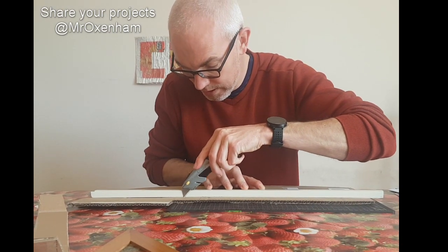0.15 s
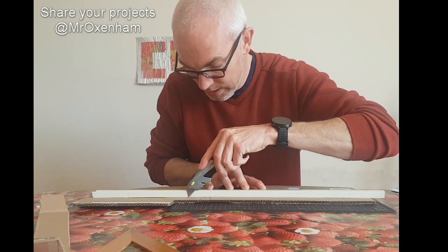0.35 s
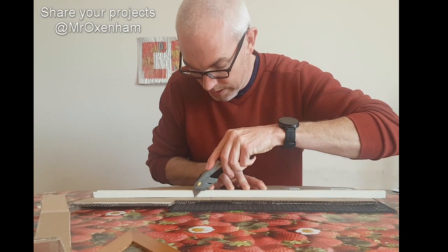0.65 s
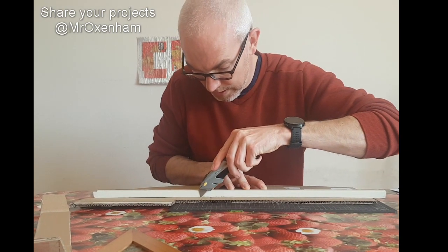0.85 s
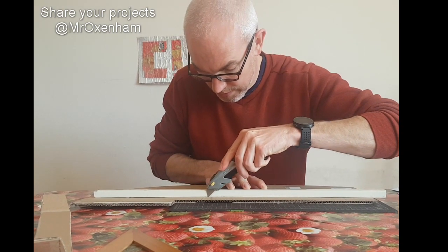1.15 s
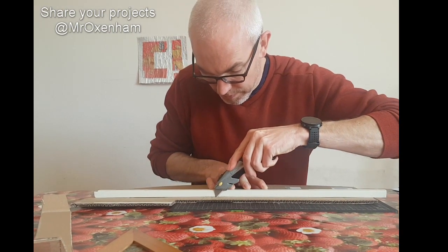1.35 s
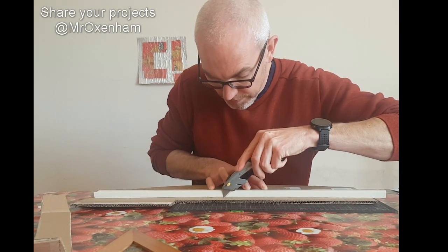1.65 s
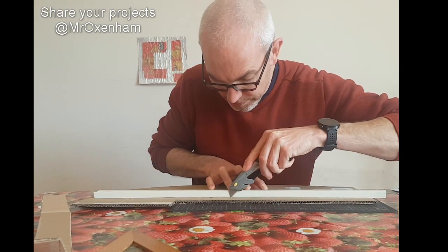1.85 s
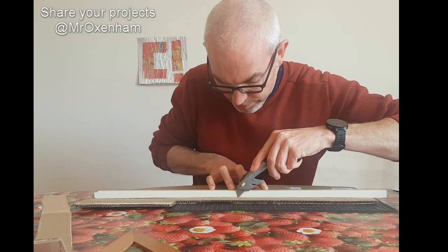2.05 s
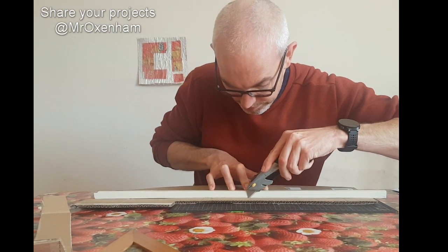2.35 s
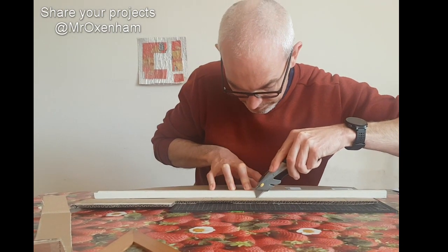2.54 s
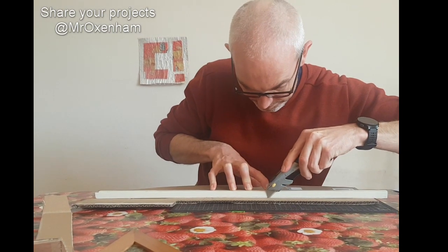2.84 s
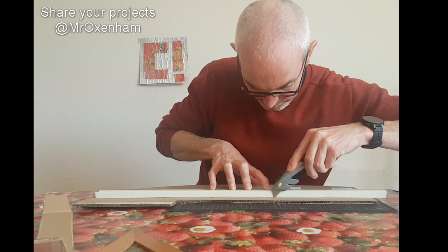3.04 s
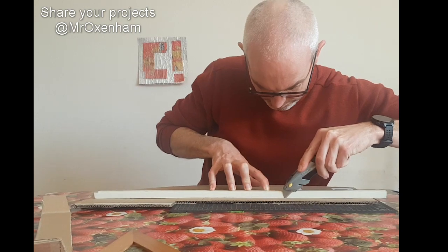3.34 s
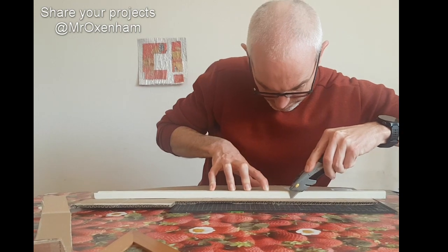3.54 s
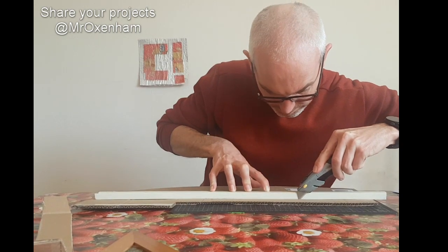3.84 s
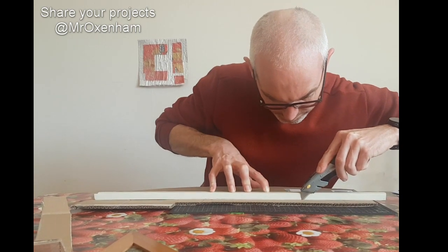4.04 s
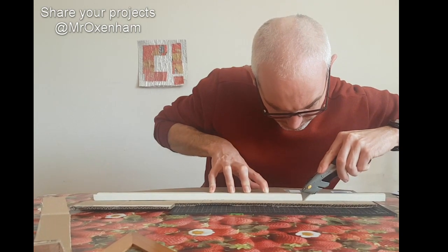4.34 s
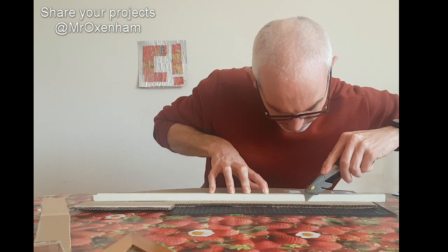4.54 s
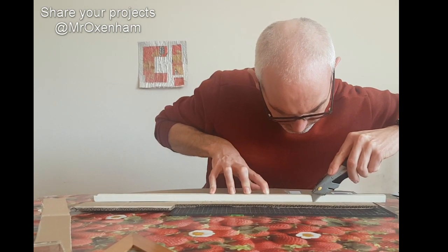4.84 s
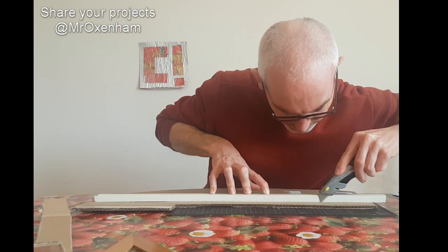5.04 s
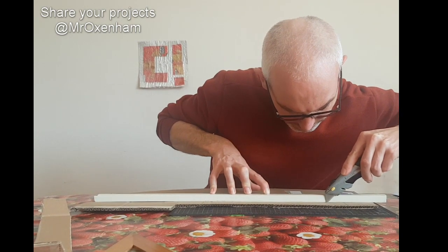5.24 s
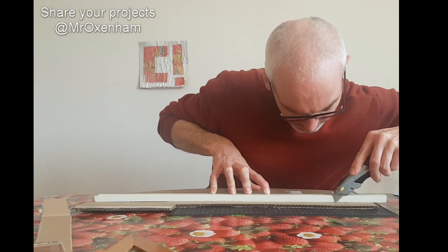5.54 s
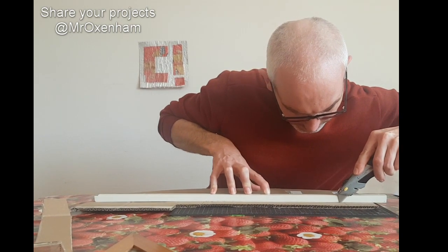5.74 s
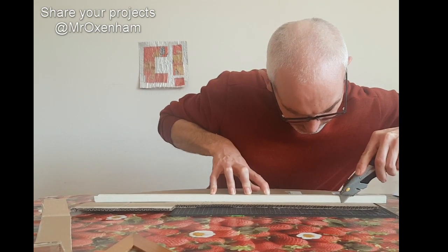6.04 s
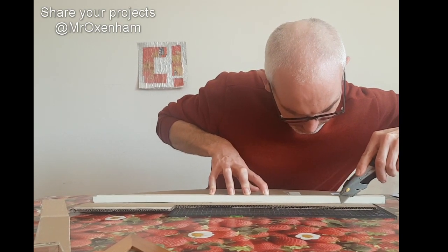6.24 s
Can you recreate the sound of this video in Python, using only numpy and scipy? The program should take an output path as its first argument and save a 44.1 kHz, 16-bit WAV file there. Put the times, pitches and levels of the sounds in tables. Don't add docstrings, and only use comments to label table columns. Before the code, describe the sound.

A utility knife rasps slowly through corrugated cardboard, fibres hissing and flutes popping in uneven bursts, with hollow board knocks and low table thumps.

```python
import sys
import numpy as np
from scipy import signal
from scipy.io import wavfile
from scipy.ndimage import uniform_filter1d, map_coordinates

SR = 44100
rng = np.random.default_rng(int(sys.argv[2]) if len(sys.argv) > 2 else 0)


def decibels_to_gain(level_db):
    exponent = np.asarray(level_db, float) / 20
    return 10 ** exponent


def store_wav(level_fs):
    pcm = np.round(np.clip(np.atleast_2d(level_fs), -1, 1) * 32767)
    wavfile.write(sys.argv[1], SR, pcm.T.astype(np.int16))


N = 281799
T = np.arange(N) / SR

# start_s, hiss_db
DRAG = [(0.0, -62.5), (0.55, -59.5), (0.72, -50.5), (1.0, -52.5), (1.22, -55.5), (1.51, -48.5), (1.58, -58),
        (1.72, -50.5), (2.45, -49), (2.75, -49), (3.9, -58.5), (4.15, -60), (4.25, -75), (4.6, -66),
        (4.9, -55.5), (5.4, -54.5), (5.88, -61), (6.03, -72.5)]
# start_s, table_db, board_db, blade_tuning (factor), board_pitch_hz
HOLD = [(0, -14, -1, 0.99, 483), (.86, -12.5, -5.5, 1.1, 484), (.95, -3, 1, 1.08, 600),
        (1.5, -10, 0.5, 1.03, 594), (1.9, 3, 2, 1.27, 487), (2.8, 9.5, 2, 1.18, 430),
        (3.6, 9.5, 5, 1.1, 442), (4.45, 9, 2, 1.22, 525), (5.3, -9.5, 0.9, 1.09, 620),
        (5.8, -1, 4.5, 0.94, 493), (6.39, -6, -4.5, 1.04, 500)]
# start_s, hiss_db, rise_ms
SLICED = [(0.042, -50.5, 23), (0.19, -48, 55), (1.07, -41.5, 32), (1.75, -47, 29), (1.835, -40, 4.3),
          (2.599, -40.5, 9.1), (3.723, -43.5, 15), (3.799, -55, 17), (4.13, -52, 4.8), (4.475, -53, 24),
          (4.54, -57, 23), (5.071, -46, 46), (5.547, -43.5, 39), (5.687, -46, 19), (5.762, -45, 15),
          (5.791, -40, 5.6), (6.138, -42.5, 24)]
# start_s, hiss_db, rise_ms
TORN = [(0.122, -45.5, 14), (0.285, -41.5, 15.7), (0.452, -39.5, 11), (0.767, -38, 7.3), (1.203, -41, 19.5),
        (1.287, -43, 30), (1.981, -39.5, 9), (2.068, -45, 12), (2.555, -43.5, 34), (2.686, -42.5, 18),
        (2.791, -43.5, 21), (2.855, -47, 14), (2.892, -45, 22), (3.005, -45.5, 27), (3.298, -42, 21),
        (3.515, -40, 20), (3.587, -43, 21), (3.865, -43.5, 12.7), (3.903, -52.5, 22), (3.951, -47.5, 24),
        (4.069, -53.5, 24), (4.667, -45.5, 21), (4.827, -48.5, 34), (4.952, -47, 21), (5.346, -42, 17),
        (5.476, -43, 28)]
# start_s, hiss_db, rise_ms
CRUSHED = [(0.858, -45, 11), (0.924, -37, 6.7), (1.365, -43, 36), (1.43, -45, 14), (1.504, -46.5, 29),
           (1.646, -42, 14.5), (2.153, -43, 11.5), (2.232, -40.5, 9.6), (2.308, -49, 46), (2.4, -53, 14),
           (3.098, -44.5, 22), (3.216, -42, 18.4), (3.41, -46, 29), (5.105, -48, 16), (5.208, -44, 20),
           (5.885, -57, 30), (5.95, -61.5, 25)]
# start_s, hiss_db
CATCHES = [
    (.412, -44.5),
    (.598, -50),
    (0.655, -40),
    (1.18, -47),
    (1.615, -42.5),
    (4.426, -52),
    (4.642, -66),
    (5.187, -58),
    (5.325, -47.5),
    (6.088, -59),
]
# centre_s, loss_db
STALLS = [(.38, 5), (1.02, 4.5), (1.145, -0.5), (2.64, 6), (2.735, 7), (2.955, 2), (3.05, 5), (3.16, 7.5),
          (3.25, 4), (3.47, 1.5), (3.665, 1), (4.02, 4.5), (4.395, 6.5), (4.62, 5.5), (4.75, 4.5),
          (5.29, 6), (5.41, 6), (5.63, 4.5)]
# start_s, peak_db, pitch_hz
KNOCKS = [(0.277, -47, 423), (0.761, -36, 600), (0.925, -11, 580), (1.04, -29, 610), (1.091, -20, 412),
          (1.197, -29, 633), (1.252, -20.5, 595), (1.33, -28, 624), (1.392, -19, 585), (1.477, -21, 396),
          (1.645, -20.5, 945), (1.857, -26, 643), (1.947, -19.5, 198), (2.188, -17.5, 217),
          (2.264, -20, 213), (2.336, -18.5, 123), (2.808, -16, 196), (2.985, -53, 122.5), (3.21, -19, 212),
          (3.325, -23.5, 200), (3.417, -20.5, 180), (3.586, -25.5, 208), (3.86, -31, 240),
          (4.647, -39, 215), (4.798, -37, 431), (4.879, -24.5, 423), (4.934, -28, 684), (5.188, -35, 673),
          (5.758, -45, 565), (5.851, -14.5, 375),
          (0.703, -37, 444), (1.062, -34, 670), (1.291, -26.5, 410), (1.676, -32, 650), (1.779, -25, 390),
         (1.897, -26, 620), (1.948, -19, 630), (2.15, -23.5, 650), (2.189, -24, 640), (2.265, -23, 640),
         (2.336, -25, 620), (2.636, -26.5, 400), (2.718, -28, 380), (3.001, -27, 540), (3.225, -32, 410),
         (3.329, -30, 410), (4.825, -31, 700), (5.081, -30, 900), (5.225, -27.5, 560), (5.788, -28, 390),
         (6.147, -29, 397)]
# start_s, peak_db, brightness_db (per octave)
SNAPS = [(0.077, -46, -2), (1.336, -32, 1), (1.4277, -38, 2), (1.6441, -24.5, 0.5), (1.98, -55, 0.1),
         (3.416, -25.5, -3), (3.5093, -31.5, 4.5), (4.0444, -40, -9), (4.1272, -41, -1), (5.103, -47, 6),
         (5.757, -32.5, 3)]
# peak_s, pressure (full scale, suction below zero), rise_ms, fall_ms
PUFFS = [
    (3.9673, -.31, 1.8, 5),
    (3.9693, -.65, .7, .34),
    (3.9704, 1.36, .45, 1.72),
    (3.974, .37, 1.3, 1),
    (6.346, .006, 1.5, 2.5),
]
# pitch_hz, width_hz, level_db
TABLE_MODES = [(68, 110, -28), (125.5, 9.2, 7), (200.7, 44, 9), (285, 540, -17), (328, 23, 3)]
# pitch_hz, width_hz, level_db
BOARD_MODES = [(327, 9.8, -10), (423, 23, 13), (495, 73, 1.5), (620, 184, 10), (760, 38, 4), (872, 76, 8),
               (944, 52, -4), (1340, 180, 3.5)]
# pitch_hz, width_hz, lift_db, follows_tuning (0-1)
BLADE_MODES = [(2653, 100, 9, 0.13), (3625, 1100, 7.5, 0.63), (11280, 780, 5, 0.25), (14200, 800, 2.5, 0)]
# freq_hz, level_db (per Hz)
FIBRE_COLOUR = [(600, -17.5), (1100, -3.5), (1600, -5), (2200, -1), (3300, -3.5), (4200, -3.5), (5200, -1),
                (7000, -4), (8900, -13.5), (10500, -9), (13000, -11.5), (15600, -9), (16100, -39)]
# freq_hz, difference_db
LEFT_COLOUR = [(1000, 5), (2500, 3), (4000, 5), (6000, -2), (8000, -4), (12000, -2), (16000, -4)]
# freq_hz, level_db (per Hz)
FAN_COLOUR = [(900, -32), (1300, -9.5), (1750, 2), (2100, 0.5), (2700, -1), (3150, -10.5), (4000, -16),
              (4800, -27), (6500, -28), (8800, -38), (12000, -32), (15500, -26.5), (16000, -42)]
# freq_hz, level_db (per Hz)
HUSH_COLOUR = [(30, 6), (80, 2.5), (200, -4), (400, 8.5), (700, -3), (1100, 1), (1800, -11), (4000, -17),
               (7000, -23), (10000, -28), (16000, -15)]
# freq_hz, t60_s
ROOM_DECAY = [(200, 0.13), (700, 0.52), (2000, 0.4), (5000, 0.45), (12000, 0.21)]

SLICED_PUSH_DB, TORN_PUSH_DB, CRUSHED_PUSH_DB = -2.5, -1.5, 3
RELEASE_SHARE = 0.78
STRAIN_DB, STRAIN_SHARE, SETTLE_MS = -8.5, 1.76, 40
CATCH_RISE_MS, CATCH_FALL_MS, CATCH_PUSH_DB = 4.9, 17.4, -2
STALL_MS = 24.4
FIZZ_DB, FIZZ_S, FIZZ_SPAN_S = 3, 3, 2.45
TOP_DB, TOP_S, TOP_SPAN_S = 5.5, 5.5, 1
SQUEAK_HZ, SQUEAK_WIDTH_HZ, SQUEAK_DB, SQUEAK_FADES_S = 3690, 120, 7, 0.92
SLIT_HZ, SLIT_WIDTH_HZ, SLIT_DB, SLIT_OPEN_S = 1165, 360, 5.5, 1.56
TABLE_HZ, TABLE_HALVES_S = 226, 3.6
LAG_START, LAG_PER_S = 0.088, 0.9
FAN_DB, HUSH_DB = -51, -66


def evened(x):
    return x / np.sqrt(np.mean(x ** 2) + 1e-20)


def read(points, hz):
    f, value = np.transpose(points)
    return np.interp(np.log(hz + 1), np.log(f + 1), value)


def colour(x, points):
    log_gain = np.log(decibels_to_gain(read(points, abs(np.fft.fftfreq(4096, 1 / SR)))))
    taps = np.fft.ifft(np.exp(np.conj(signal.hilbert(log_gain)))).real
    return signal.oaconvolve(x, taps[:2048])[:len(x)]


def low_cut(x, hz):
    return signal.sosfilt(signal.butter(2, hz, "high", fs=SR, output="sos"), x)


def ring(x, modes):
    out = np.zeros(len(x))
    for hz, width, db in modes:
        r = np.exp(-np.pi * width / SR)
        pole = r * np.exp(2j * np.pi * hz / SR)
        out += decibels_to_gain(db) * 2 * signal.lfilter([1 - r], [1, -pole], x).imag
    return out


def favour(hz, pitch_hz):
    octaves = abs(np.log2(hz / pitch_hz))
    return -9 * octaves ** 2 / (1 + .5 * octaves)


def grains(per_s, spread_db):
    draw = rng.random((3, N))
    size = decibels_to_gain(spread_db * np.minimum(-np.log(draw[0] + 1e-9), 5))
    sign = np.sign(draw[1] - .5)
    return evened(size * sign * (draw[2] < per_s / SR))


def add(mix, s, sound):
    part = mix[round(s * SR):][:len(sound)]
    part += sound[:len(part)]


def hold(column):
    return np.interp(T, [row[0] for row in HOLD], [row[column] for row in HOLD])


def force():
    hiss = decibels_to_gain(np.interp(T, *np.transpose(DRAG)) - 4.5) ** 2
    push = hiss.copy()
    kinds = (SLICED, SLICED_PUSH_DB), (TORN, TORN_PUSH_DB), (CRUSHED, CRUSHED_PUSH_DB)
    walls = [(s, db, ms, RELEASE_SHARE * ms, push_db) for rows, push_db in kinds for s, db, ms in rows]
    catches = [(s, db, CATCH_RISE_MS, CATCH_FALL_MS, CATCH_PUSH_DB) for s, db in CATCHES]
    for s, db, rise_ms, fall_ms, push_db in walls + catches:
        near = slice(max(round((s - .15) * SR), 0), round((s + .2) * SR))
        ms = 1000 * (T[near] - s)
        swell_ms = np.where(ms < 0, rise_ms, fall_ms)
        strain_ms = np.where(ms < 0, STRAIN_SHARE * rise_ms, SETTLE_MS)
        swell = decibels_to_gain(db - 5.5) ** 2 * np.exp(-abs(ms / swell_ms) ** 2.5)
        strain = decibels_to_gain(db - 7.0 + STRAIN_DB) ** 2 * np.exp(-(ms / strain_ms) ** 2)
        hiss[near] += swell + strain
        push[near] += swell * decibels_to_gain(push_db - 2.5) ** 2 + strain
    moving = decibels_to_gain(-sum(db * np.exp(-(1000 * (T - s) / STALL_MS) ** 2) for s, db in STALLS))
    return moving * np.sqrt(hiss), moving * np.sqrt(push)


def fibres(hiss):
    streams = [grains(14000, 2.0) for k in range(3)]
    hz, t, z = signal.stft(streams, SR, nperseg=256, noverlap=192)
    hz, tuning = hz[:, None], np.interp(t, T, hold(column=3))

    patches = rng.standard_normal((len(t), len(hz))).T
    patches = uniform_filter1d(patches, size=6, axis=0)
    patches = evened(uniform_filter1d(patches, size=24, axis=1))

    effort_db = 20 * np.log10(hiss)
    excess_db = effort_db - uniform_filter1d(effort_db, size=12000)
    surge_db = 5.1 * np.tanh((excess_db + 4.5) / 6.8) - 0.54 * excess_db
    chatter_db = 2.8 * evened(uniform_filter1d(rng.standard_normal(len(t)), size=6))
    passing = np.exp(-((t - FIZZ_S) / FIZZ_SPAN_S) ** 2)
    fizz_db = (FIZZ_DB + np.interp(t, T, surge_db)) * passing - 1.5 + chatter_db
    tip_db = TOP_DB * np.exp(-((t - TOP_S) / TOP_SPAN_S) ** 2) - 2.0
    squeak_db = SQUEAK_DB * np.exp(-(t / SQUEAK_FADES_S) ** 2)
    slit_db = SLIT_DB * (np.tanh(t - SLIT_OPEN_S) / 2)

    db = read(FIBRE_COLOUR, hz) + 2.1 * patches
    db = db + fizz_db / (1 + (8000 / (hz + 1)) ** 6)
    db = db + tip_db / (1 + (12800 / (hz + 1)) ** 16)
    db = db + squeak_db / (1 + (2 * (hz - SQUEAK_HZ) / SQUEAK_WIDTH_HZ) ** 2)
    db = db + slit_db / (1 + (2 * (hz - SLIT_HZ) / SLIT_WIDTH_HZ) ** 2)
    for centre_hz, width, lift_db, follows in BLADE_MODES:
        db = db + lift_db / (1 + (2 * (hz - centre_hz * tuning ** follows) / width) ** 2)
    return evened(signal.istft(z * decibels_to_gain(db), SR, nperseg=256, noverlap=192)[1][:, :N])


def drumming(push):
    out = np.zeros(N)
    table_hz = TABLE_HZ * .5 ** (T / TABLE_HALVES_S)
    board = grains(700, 2.1), BOARD_MODES, hold(column=2), hold(column=4), 230
    table = grains(1500, 2.0), TABLE_MODES, hold(column=1), table_hz, 52
    for slips, modes, coupling_db, pitch_hz, cut_hz in (board, table):
        slips = uniform_filter1d(slips, size=16)
        drive = slips * push * decibels_to_gain(coupling_db + 2.5) / ring(slips, modes).std()
        body = sum(ring(drive * decibels_to_gain(0.64 * favour(mode[0], pitch_hz)), [mode]) for mode in modes)
        out += low_cut(low_cut(body, cut_hz), cut_hz)
    return low_cut(out, 67)


def fan():
    flutter = evened(uniform_filter1d(rng.standard_normal(N), 300))
    hiss = evened(colour(rng.standard_normal(N), FAN_COLOUR)) * decibels_to_gain(FAN_DB + 0.54 * flutter)
    return np.array([hiss, decibels_to_gain(-29) * np.roll(hiss, 9)])


def hush():
    left, right, shared = (evened(colour(v, HUSH_COLOUR)) for v in rng.standard_normal((3, N)))
    return decibels_to_gain(HUSH_DB) * np.array([decibels_to_gain(2) * (left + 1.43 * shared), right + 1.04 * shared]) / 1.9


def ears(x):
    late = map_coordinates(x, [np.arange(N) - LAG_START - LAG_PER_S * T], order=3, mode="nearest")
    return np.array([late, x])


def tail():
    taps = np.zeros((2, SR // 2))
    at = np.arange(120, SR // 2 - 20, 20) + rng.integers(0, 20, (2, (SR // 2 - 121) // 20))
    np.put_along_axis(taps, at, rng.choice([-1., 1.], at.shape), 1)
    hz, t, z = signal.stft(taps, SR, nperseg=256)
    decay = decibels_to_gain(-60 * t / read(ROOM_DECAY, hz)[:, None])
    out = signal.istft(z * decay, SR, nperseg=256)[1]
    return out / np.linalg.norm(out[0])


def room(x):
    shares = [np.sqrt(2 / 3) * np.cos(2 * np.pi * (T / 1.3 + k / 3)) for k in range(3)]
    return sum(signal.fftconvolve((x * share)[None], tail(), axes=1)[:, :N] for share in shares)


def snaps():
    out, t = np.zeros(N), np.arange(400) / SR
    envelope = np.exp(-(t / .0028) ** 2) * (1 - np.exp(-(t / .0016) ** 3))
    for s, db, tilt_db in SNAPS:
        tint = [(700, -30), (1500, -tilt_db - 4), (6000, 0), (8900, -6), (12000, tilt_db), (16000, tilt_db - 2)]
        crack = colour(rng.standard_normal(400) * envelope, tint)
        add(out, s + 0.00071, decibels_to_gain(db + 4.0) * crack / abs(crack).max())
    return out


def knocks():
    out = np.zeros(N)
    for s, db, hz in KNOCKS:
        blow, start = np.zeros(3000), 50
        if hz < 300:
            blow[start:start + 56] = -np.hanning(56)
        else:
            blow[start:start + 44] = np.sin(np.linspace(0, 2 * np.pi, 44))
        modes = [(f, 0.72 * width, level + 0.97 * favour(f, hz)) for f, width, level in TABLE_MODES + BOARD_MODES]
        knock = low_cut(low_cut(ring(blow, modes), 0.29 * hz), 0.32 * hz)
        add(out, s, decibels_to_gain(db - 8.5) * knock / abs(knock).max())
    return low_cut(out, 67)


def puffs():
    out = np.zeros(N)
    for s, pressure, rise_ms, fall_ms in PUFFS:
        ms = 1000 * (T - s)
        out += pressure * np.exp(-(ms / np.where(ms < 0, rise_ms, fall_ms)) ** 2)
    out = low_cut(out, 75)
    return np.array([out, 0 * out])


def scene():
    hiss, push = force()
    shared, *apart = hiss * fibres(hiss)
    high = shared + snaps()
    low = drumming(push) + knocks()
    near = ears(high) + decibels_to_gain(-0.5) * np.array(apart) + decibels_to_gain(-3.0) * room(high)
    near[0] = colour(near[0], LEFT_COLOUR)
    body = ears(low) + decibels_to_gain(-11.5) * room(low)
    return near + body + fan() + hush() + puffs()


def band_limit(x):
    return signal.sosfilt(signal.butter(12, 16490, fs=SR, output="sos"), x)


def record(dry):
    limited = dry / (1 + abs(dry / .95) ** 14) ** (1 / 14)
    edge = signal.firwin(401, 15850, window=("kaiser", 9), fs=SR)
    finished = signal.oaconvolve(limited, edge[None], "same") - .0006
    return band_limit(finished)


dry = scene()
out = record(dry)
store_wav(out)
```